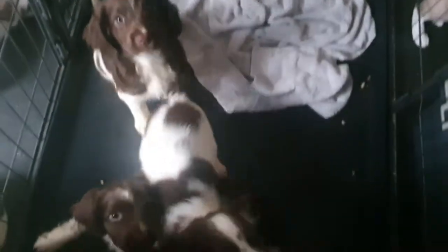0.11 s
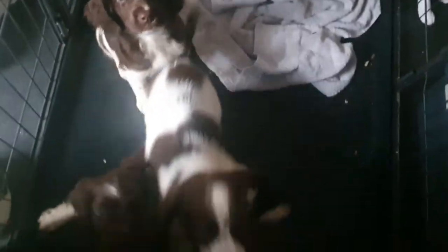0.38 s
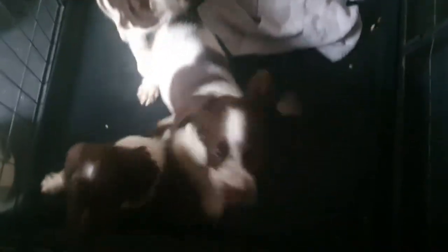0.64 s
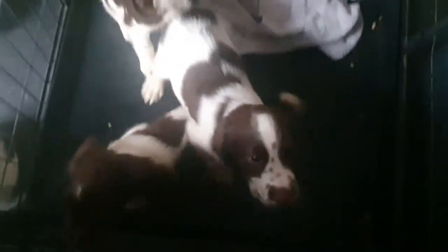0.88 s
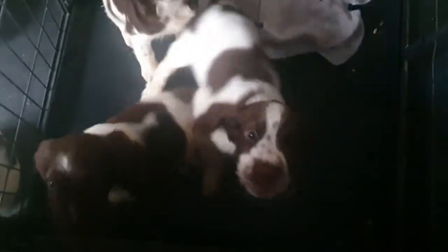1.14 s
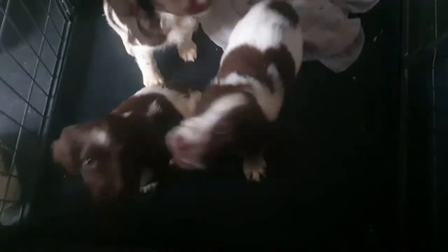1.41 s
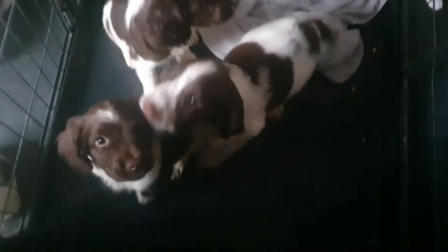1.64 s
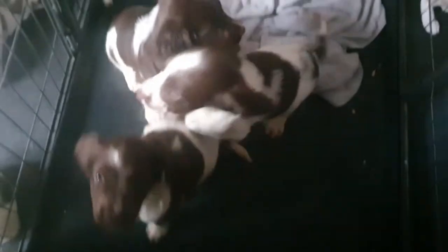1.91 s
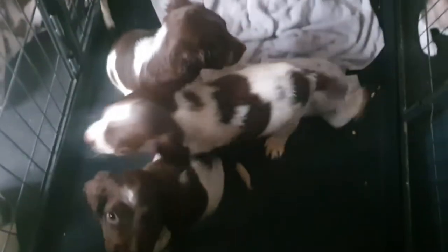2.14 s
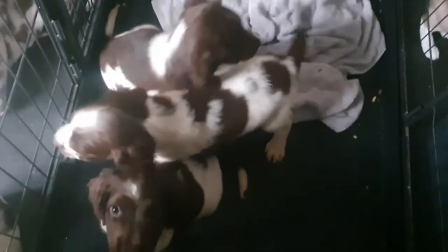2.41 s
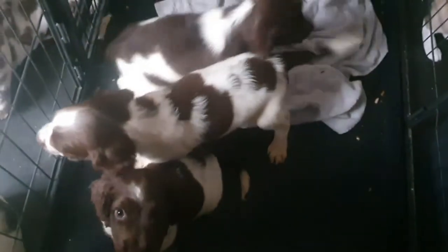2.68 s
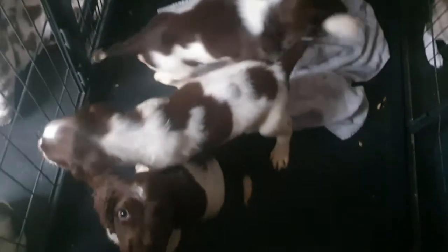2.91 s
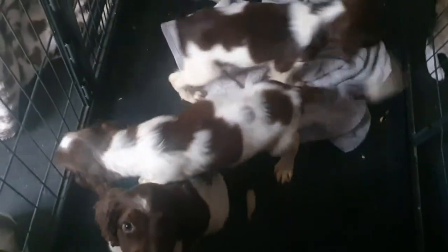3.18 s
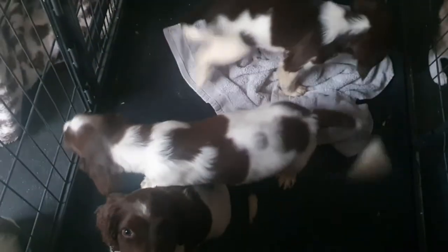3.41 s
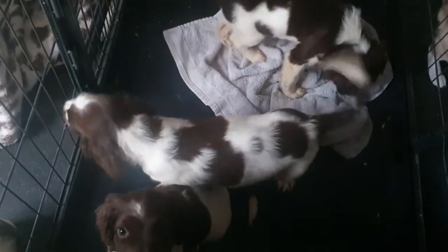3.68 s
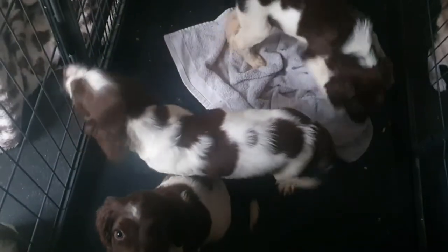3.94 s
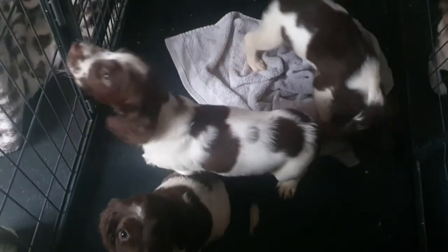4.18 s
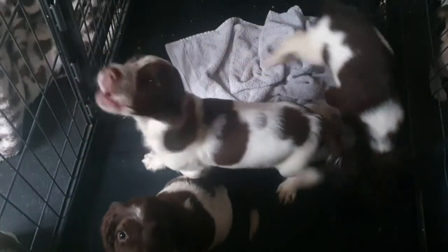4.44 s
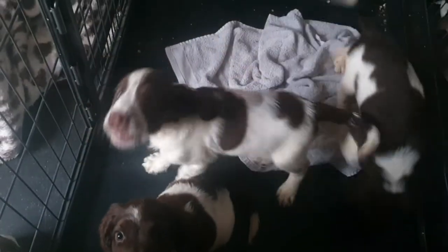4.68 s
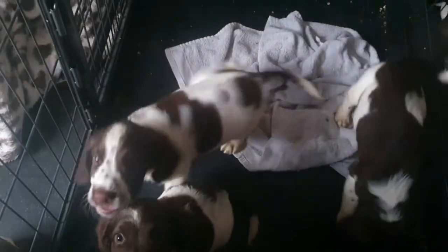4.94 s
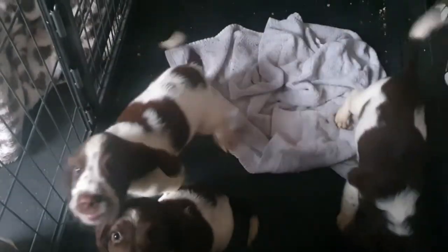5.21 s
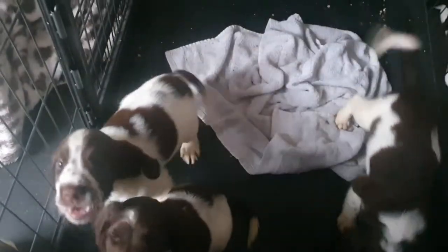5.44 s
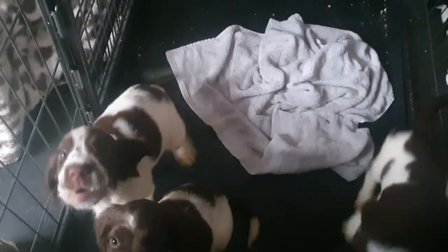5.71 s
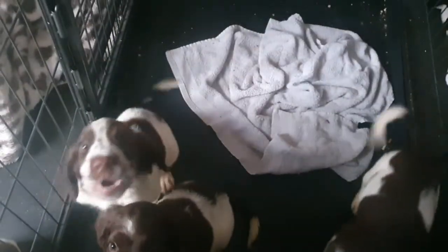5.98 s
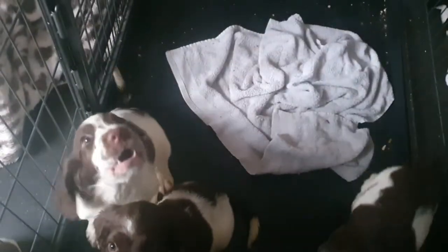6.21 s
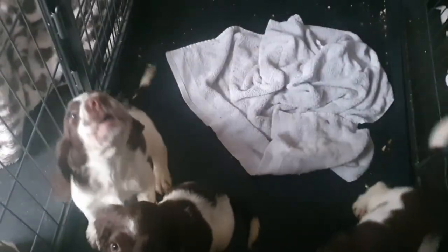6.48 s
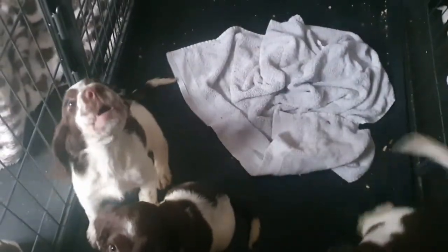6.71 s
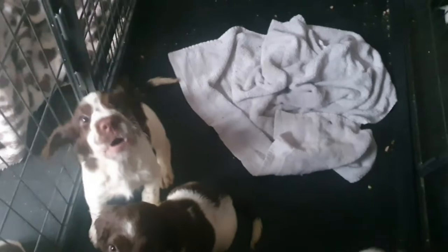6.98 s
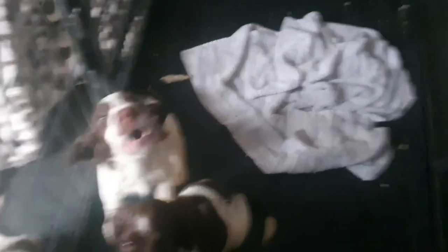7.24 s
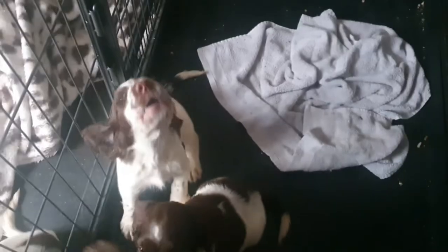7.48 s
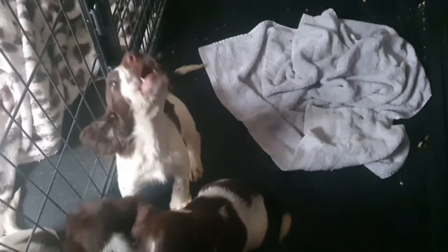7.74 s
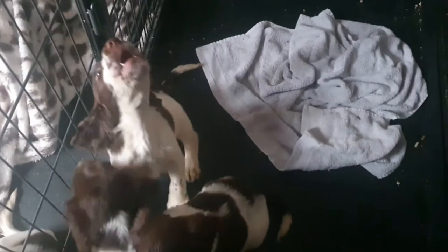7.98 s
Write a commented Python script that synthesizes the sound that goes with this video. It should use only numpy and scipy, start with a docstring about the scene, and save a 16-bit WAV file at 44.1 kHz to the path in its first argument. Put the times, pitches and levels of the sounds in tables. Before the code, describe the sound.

A string of fourteen shrill puppy cries, each ending in a quick downward drop, with tiny gaps between. The early ones are high and raspy, the last two lower, smoother and drawn out, the final one loud and nearer the centre. Littermates whimper faintly, noses sniff and whistle, paws bump the tray. Close stereo pickup, short bright indoor reverberation, quiet hush.

```python
"""Puppy crying in a wire pen

A puppy yelps and howls close to a stereo microphone in a small hard room: harmonics on a trembling pitch plus
breath noise. Other puppies whine faintly (gliding tones), noses whistle and sniff, paws thud on the floor tray
and the wire ticks (dying noise bursts). Soft steps, room hush and a tail of sparse taps lie beneath.
"""
import sys
import numpy as np
from scipy import signal
from scipy.fft import rfft, irfft
from scipy.io import wavfile
from scipy.ndimage import uniform_filter1d, minimum_filter1d

SR = 44100
rng = np.random.default_rng(int(sys.argv[2]) if len(sys.argv) > 2 else 0)


def makeup_ratio(level_db):
    """Linear amplitude ratio for a level in decibels (20 dB per factor of ten)."""
    decades = np.asarray(level_db, float) / 20
    return 10 ** decades


def wav_record(signal):
    """Record a signal, one row per channel, as 16-bit PCM in the file named by sys.argv[1]."""
    frames = np.transpose(np.atleast_2d(signal))
    bounded = np.clip(frames, -1, 1)
    # unit amplitude maps onto the largest positive 16-bit level
    quanta = np.round(bounded * 32767).astype(np.int16)
    wavfile.write(sys.argv[1], SR, quanta)


N = 358029  # samples

# One list per cry, until the breath runs out: (time [s], pitch [Hz], effort [dB], mouth opening [0-1])
CRIES = [
    [(0.0, 1530, -12.5, 0), (0.032, 1452, -25, 0.18), (0.072, 1348, -15, 0.13), (0.106, 1293, -30.5, 0.28),
     (0.134, 1180, -29, 0.19), (0.196, 1258, -26, 0.26), (0.252, 1339, -30.5, 0.44)],
    [(0.413, 1666, -17, 0.46), (0.44, 1589, -19.5, 0.8), (0.489, 1742, -15, 0.45), (0.537, 1830, -17.5, 1),
     (0.598, 1876, -24, 1)],
    [(0.78, 1512, -7, 0.01), (0.802, 1529, -23.5, 0.57), (0.832, 1804, -21.5, 0.6),
     (0.868, 1796, -15.5, 0.51), (1.018, 1804, -17, 0.4), (1.036, 1783, -28, 1)],
    [(1.217, 1120, -13, 0.07), (1.227, 1144, -18.5, 0.14), (1.271, 1659, -11.5, 0.48),
     (1.415, 1580, -21, 0.77), (1.537, 1638, -22, 0.47), (1.595, 1592, -23.5, 0.75),
     (1.66, 1642, -27, 0.62)],
    [(1.836, 1148, -20.5, 0.33), (1.87, 1294, -26.5, 0.48), (2.036, 1359, -20, 0.27),
     (2.196, 1090, -31.5, 0.79), (2.22, 1128, -25.5, 0.8), (2.418, 1140, -22, 0.75),
     (2.445, 1138, -29.5, 1)],
    [(2.636, 1140, -28.5, 0.47), (2.688, 1426, -27, 0.78), (2.734, 1529, -26, 0.85),
     (2.838, 1205, -20, 0.41), (2.94, 1169, -10.5, 0.36), (2.985, 1062, -13, 0.42)],
    [(3.203, 886, -34, 0.9), (3.267, 956, -24, 0.58), (3.335, 912.5, -30, 1), (3.379, 975, -23.5, 0.52),
     (3.429, 988, -13, 0.39), (3.516, 970.3, -24.5, 0.46)],
    [(3.714, 1155, -15, 0.29), (3.742, 1098, -20, 0.44), (3.77, 1170, -12.5, 0.28),
     (3.805, 1120, -13, 0.32), (3.9, 1173, -16, 0.4), (4.035, 1138, -16, 0.31), (4.066, 1227, -10.5, 0.26),
     (4.128, 1212, -19, 0.43)],
    [(4.3, 1310, -20, 0.8), (4.31, 1264, -20.5, 0.56), (4.348, 1532, -16.5, 0.68), (4.472, 1498, -21, 0.78),
     (4.564, 1497, -15.5, 0.86), (4.595, 1474, -16.5, 0.45)],
    [(4.775, 1034, -16, 0), (4.8, 1210, -17, 0.36), (4.82, 1477, -14, 0.45), (4.887, 1507, -13, 0.76),
     (4.945, 1537, -14.5, 0.67), (5.105, 1432, -22, 0.61)],
    [(5.294, 1027, -14, 0.23), (5.308, 1016, -23.5, 0.06), (5.336, 1309, -22.5, 0.79),
     (5.455, 1313, -15, 0.65), (5.478, 1436, -17, 0.71), (5.612, 1367, -21, 0.89), (5.632, 1310, -17, 0.62),
     (5.69, 1277, -20, 0.81), (5.8, 1296, -19.5, 0.47), (5.811, 1200, -34, 0.3)],
    [(5.986, 975, -23.5, 0.1), (6.022, 1040, -22, 0.17), (6.078, 1337, -21, 0.62), (6.286, 1272, -16, 0.73),
     (6.366, 1240, -23, 0.58), (6.43, 1093, -21.5, 0.43), (6.467, 1044, -29.5, 0.2)],
    [(6.651, 818, -30, 0), (6.671, 904, -24.5, 0.08), (6.75, 1003, -28, 0.72), (6.865, 957.5, -25.5, 0.39),
     (7.079, 1005, -24, 0.56), (7.177, 963, -21, 0.35), (7.305, 976, -20, 0.41), (7.475, 923, -18.5, 0.14)],
    [(7.661, 735, -26, 0.67), (7.701, 920, -16.5, 0.38), (7.715, 985.6, -7, 0.52),
     (7.795, 978.4, -8.5, 0.38), (8.118, 968, -13, 0)],
]
# Head direction per cry: (left-right level [dB], left lead [ms])
BEARING = [(-6.5, 0.009), (-4, 0.017), (-5.5, 0.0064), (-9.5, 0.13), (-3.5, 0.18), (-4.5, 0.21), (-5, 0.21),
           (-5, 0.15), (-5.5, 0.19), (-8, 0.2), (-6.5, 0.16), (-7.5, 0.081), (-5.5, 0.097), (-1, 0.086)]
# Voicing per cry: (roughness [0-1], breath re overtones [dB], treble [dB],
# throat stretch [share of its resonances], closing drop [s])
VOICING = [(0.47, -19, 14.5, 0.888, 0.014), (0.5, -29, 1, 0.984, .04), (0.28, -27, 6.5, 0.986, .043),
           (0.45, -31.5, -7.5, 0.888, .058), (0.3, -33, -5, 0.84, 0.05), (.55, -20.5, -6, 0.939, 0.068),
           (0.55, -20, -2, 0.98, 0.018), (0.6, -23, -1.5, 1.012, 0.042), (0.35, -22.5, -1, 0.95, 0.06),
           (0.2, -25.5, -12.5, 1, .06), (0.5, -34.5, -13, 1.024, 0.025), (0.28, -34.5, -12, 1.05, 0.033),
           (0.14, -38.5, -13, 0.98, .045), (0.1, -32, -16.5, 1.07, 0.095)]
# Harmonics 2, 3, 4 of the folds per cry, re throat colour: (second [dB], third [dB], fourth [dB])
FOLDS = [(-5, 7, 3.5), (4.5, 3.5, 1), (5.5, 7, 0), (3, 8, 8), (-7.5, 6, 1.5), (-2.5, -0.5, 5),
         (-4.5, 4.5, -2), (0, 3, 2.5), (7.5, 1.5, 4), (4.5, 0.4, 0.5), (1.5, -1, 4.5), (11, -1.5, 2),
         (0.5, -8, 0.5), (-0.5, -2.5, 0)]
# Open-mouth overtone colour re fundamental: (frequency [Hz], level [dB])
THROAT = [(1600, 9.5), (2900, 0.5), (3500, 9), (4300, -2.5), (5300, -16), (5900, -17), (6500, -12),
          (7500, -14.5), (9800, -16), (12000, -31), (15500, -35.5)]
# Breath noise colour: (frequency [Hz], level [dB])
BREATH = [(300, -30), (800, -6.5), (1300, -3), (2000, -17.5), (2900, -5), (4300, -8.5), (5500, -15),
          (7000, -5), (8200, -13.5), (9700, -4), (11200, -17.5), (12800, -11.5), (15500, -37.5)]
# Brief catches that bend the pitch and let it back: (time [s], half width at 1/e [s], pitch change [share])
CATCHES = [(1.905, 0.012, .06), (5.386, 0.0069, 0.066), (5.527, 0.0092, -0.039)]
# Treble shading between the ports: (frequency [Hz], factor on the left-right dB)
SHADOW = [(300, 2.5), (1300, -0.01), (2400, 2.5), (5000, 3), (15000, 2.32)]
# Band decay of the room: (frequency [Hz], t60 [s])
ROOM_T60 = [(500, 0.27), (2000, 0.34), (4000, 0.33), (9000, 0.41)]
# Hush colour: (frequency [Hz], level [dB])
HUSH_COLOUR = [(30, -25), (90, -16.5), (300, -21), (1000, -10.5), (3500, -21), (9700, -25), (15500, -35.5)]
# Colour of the tray's low end: (frequency [Hz], level [dB])
TRAY_LOW = [(30, -32.5), (75, 5), (200, -11.5), (600, -32), (2000, -69.5)]
# Colour of a paw's impact on the tray: (frequency [Hz], level [dB])
TRAY = [(30, -46), (75, -20), (170, -1.5), (400, -2), (900, -7), (2000, -13.5), (8000, -35)]
# Paws on the tray: (time [s], impact level [dB], low-end boom level [dB])
THUDS = [(0.041, -25, -54), (0.113, -34, -48), (0.609, -37.5, -46), (3.895, -42.5, -44.5),
         (4.447, -75, -48), (5.068, -45.5, -53), (5.891, -35, -54), (6.958, -42, -50), (7.147, -47.5, -55),
         (7.335, -51, -50), (7.733, -35.5, -37)]
# Wire colour: (frequency [Hz], level [dB])
WIRE = [(1000, 25.5), (5000, 18.5), (15000, 12.5)]
# Wire ticks: (time [s], level [dB])
TICKS = [(0.114, -27), (0.319, -33.5)]
# Airy nose whistles during some cries: (start [s], length [s], start pitch [Hz], end pitch [Hz], level [dB])
NOSE = [(1.036, 0.034, 9070, 10300, -36), (2.633, 0.22, 10000, 9840, -38.5),
        (4.03, .12, 10140, 9610, -33.5), (4.577, 0.063, 9760, 9200, -35)]
# Whines of other puppies: (start [s], length [s], start pitch [Hz], end pitch [Hz], mid level [dB])
WHINES = [(1.752, 0.14, 1003, 955, -44), (2.497, .09, 995, 718, -50.5), (3.196, 0.1, 1167, 1010, -33.5),
          (3.497, 0.29, 900, 510, -52), (3.641, 0.073, 1262, 902, -33), (5.401, 0.23, 1186, 778, -37),
          (5.91, 0.15, 830, 903, -42), (6.054, 0.67, 856, 458, -43.5), (7.827, 0.18, 703, 610, -42)]
# Thin nose whistles: (start [s], length [s], start pitch [Hz], end pitch [Hz], mid level [dB])
WHISTLES = [(3.1, .1, 7300, 8400, -46), (3.57, .08, 7900, 8600, -44), (4.22, .08, 8400, 9500, -44),
            (4.33, .22, 4050, 3550, -42), (5.27, .28, 7450, 5850, -45)]
# Microphone housing, a dip then a lift: (frequency [Hz], gain [dB])
HOUSING = [(1650, 0), (2050, -4), (2500, 2.5)]

# Roughness: each setting applies in full at roughness 1
TREMBLE_SHARE = 0.01945  # rms, of pitch
RASP_DB, RASP_HZ = 2.5, 57.5  # quick uneven loudness
BLUR_TURNS, FUZZ_SHARE, FUZZ_HZ = 0.0078, 0.045, 143  # phase wander per order above 1; uneven loudness
# Extra as the folds go slack; dulling is per order above 1
DROP_BLUR_TURNS, DROP_FUZZ_SHARE, DROP_DULL_DB = 0.08, 0.69, -2
# Last push: shares of the drop's time and depth; levels re median effort
SLACK_HZ, PUSH_TIME_SHARE, PUSH_DEPTH_SHARE, PUSH_DB, FADE_DB = 700, 0.62, 0.45, -1.5, -19
SHUT_DB = -33  # overtone loss with the mouth shut
LEAK_DB = -9  # breath drive re effort that remains without overtones
ROOM_DB, HUSH_DB = -3.5, -57
SHUFFLE_DB, STEPS_PER_S = -71, 8
OVERTONE_DB, SNIFF_DB = -11, -3.5  # whine overtones re fundamental; sniff re its whistle
WHINE_SWELL_DB, WHISTLE_SWELL_DB = 6, 23  # growth, start to end
CEILING = 0.88  # limiter, full scale = 1


def evened(x):
    """Scales to rms 1."""
    return x / np.sqrt(np.mean(x ** 2) + 1e-20)


def read(points, hz):
    """Interpolates a table over log frequency."""
    f, value = np.transpose(points)
    return np.interp(np.log(hz + 1), np.log(f + 1), value)


def add(mix, start_s, sound):
    """Mixes a sound in at its start time, cut at the end."""
    part = mix[:, round(start_s * SR):][:, :sound.shape[1]]
    part += sound[:, :part.shape[1]]


def noise(colour, count):
    """Noise of rms 1 with the given colour."""
    hz = np.fft.rfftfreq(count, 1 / SR)
    spectrum = rfft(rng.standard_normal(count)) * makeup_ratio(read(colour, hz))
    return evened(irfft(spectrum, count))


def drift(count, hz):
    """Slow random movement of rms 1, mostly below hz."""
    return noise([(4, 0), (hz, -5), (12 * hz, -110)], count)


def patchy(x, depth_db):
    """Makes noise come and go in patches of frequency and time."""
    z = signal.stft(x, nperseg=256)[2]
    field = uniform_filter1d(rng.standard_normal(z.shape), size=5, axis=0)
    field = uniform_filter1d(field, size=14, axis=1)
    return signal.istft(z * makeup_ratio(depth_db * evened(field)), nperseg=256)[1][:len(x)]


def placed(x, pan_db, lead_ms):
    """Two ports hear the sound at different times, with level difference varying by frequency."""
    x = np.pad(x, 64)
    hz = np.fft.rfftfreq(len(x), 1 / SR)
    side = np.array([[0.5], [-0.5]])
    gain = makeup_ratio(side * pan_db * read(SHADOW, hz))
    advance = np.exp(2j * np.pi * hz * side * lead_ms / 1000)
    return irfft(rfft(x) * gain * advance, len(x))[:, 64:]


def with_drop(rows, drop_s):
    """Appends a last push and the closing pitch drop, as the folds go slack."""
    end_s, hz, _, _ = rows[-1]
    usual_db = np.median(np.transpose(rows)[2])
    push_hz = hz + PUSH_DEPTH_SHARE * (SLACK_HZ - hz)
    return [*rows, (end_s + PUSH_TIME_SHARE * drop_s, push_hz, usual_db + PUSH_DB, 0),
            (end_s + drop_s, SLACK_HZ, usual_db + FADE_DB, 0)]


def cry(rows, pan_db, lead_ms, rough, breath_db, treble_db, stretch, drop_s, second_db, third_db, fourth_db):
    """Harmonics on a trembling pitch; the mouth lets out the overtones and the breath noise."""
    s, *columns = np.transpose(with_drop(rows, drop_s))
    t = np.arange(s[0], s[-1], 1 / SR)
    hz, effort_db, mouth = (np.interp(t, s, c) for c in columns)
    tremble = TREMBLE_SHARE * rough * drift(len(t), 34.6)
    catches = sum(share * np.exp(-((t - at) / wide) ** 2) for at, wide, share in CATCHES)
    hz = hz * (1 + tremble + catches)
    turns = np.cumsum(hz) / SR
    k = np.arange(1, 18)[:, None]  # harmonic order

    throat_hz = k * hz / stretch
    throat_db = read(THROAT, throat_hz) + SHUT_DB * (1 - mouth)
    folds_db = (k == 2) * second_db + (k == 3) * third_db + (k == 4) * fourth_db
    shelf_db = np.interp(throat_hz, [5600, 6300, 9500, 12500], [0, 1, 1, 0]) * treble_db
    weight = makeup_ratio(np.where(k > 1, throat_db, 0) + folds_db + shelf_db) * (k * hz < 16000)
    weight = weight * makeup_ratio(effort_db) / np.sqrt((weight ** 2).sum(0))

    # each harmonic swells and fades on its own, the high ones most
    shimmer_db = np.minimum(0.8 * k, 7) * (0.5 + rough) * np.array([drift(len(t), 15) for _ in k])
    shimmer_db = shimmer_db + RASP_DB * rough * drift(len(t), RASP_HZ)
    slack = np.clip((t - rows[-1][0]) / drop_s, 0, 1)
    dull_db = DROP_DULL_DB * (k - 1) * np.sqrt(slack)
    # uneven cycles smear the high harmonics into bands of noise
    blur = BLUR_TURNS * rough + DROP_BLUR_TURNS * slack
    wander = (k - 1) * blur * np.array([drift(len(t), FUZZ_HZ) for _ in k])
    phase = 2 * np.pi * (k * turns + wander + rng.random(k.shape))
    tone = (weight * makeup_ratio(shimmer_db + dull_db) * np.sin(phase)).sum(0)
    tone = tone * (1 + (FUZZ_SHARE * rough + DROP_FUZZ_SHARE * slack) * drift(len(t), FUZZ_HZ))

    overtone_power = (weight[1:] ** 2).sum(0)
    breath = np.sqrt(overtone_power + makeup_ratio(2 * (effort_db + LEAK_DB))) * makeup_ratio(breath_db)
    colour = [(f, db + (f > 5000) * treble_db / 2) for f, db in BREATH]
    puffs = patchy(noise(colour, len(t)), 4)
    edges = np.minimum(np.minimum(t - t[0], t[-1] - t) / 0.0097, 1)
    return s[0], placed(edges * (np.sqrt(2) * tone + breath * puffs), pan_db, lead_ms)


def room(x):
    """Sparse taps of random sign, each band dying at its own speed, other taps in each port."""
    taps = np.zeros((2, SR))
    at = np.arange(120, SR - 20, 20) + rng.integers(0, 20, (2, (SR - 121) // 20))
    np.put_along_axis(taps, at, rng.choice([-1., 1.], at.shape), 1)
    hz, t, z = signal.stft(taps, SR, nperseg=256)
    decay = makeup_ratio(-60 * t / read(ROOM_T60, hz)[:, None])
    tail = signal.istft(z * decay, SR, nperseg=256)[1]
    tail = tail / np.linalg.norm(tail[0])
    return makeup_ratio(ROOM_DB) * signal.fftconvolve(x.mean(0)[None], tail, axes=1)[:, :N]


def hush():
    """Quiet room noise, unlike in the two ports, coming and going slowly."""
    ports = np.array([patchy(noise(HUSH_COLOUR, N), 3) for _ in range(2)])
    return makeup_ratio(HUSH_DB + 2.5 * drift(N, 4)) * ports


def shuffle():
    """Soft random steps ring the low end of the tray."""
    steps = makeup_ratio(4 * rng.exponential(1, N)) * (rng.random(N) < STEPS_PER_S / SR)
    t = np.arange(SR // 4) / SR
    swell = signal.oaconvolve(steps, t * makeup_ratio(-60 * t / 0.2))[:N]
    return makeup_ratio(SHUFFLE_DB) * evened(swell) * placed(noise(TRAY_LOW, N), 1.5, 0.1)[:, :N]


def knock(colour, level_db, t60_s, pan_db, rise_s):
    """An impact: coloured noise that dies away, partly unlike in the two ports."""
    t = np.arange(SR // 3) / SR
    common, left, right = (noise(colour, len(t)) for _ in range(3))
    pair = 0.98 * common + 0.71 * np.array([left, right])
    pan = np.array([[0.5], [-0.5]]) * pan_db
    return pair * makeup_ratio(level_db - 60 * t / t60_s + pan) * np.minimum(t / rise_s, 1)


def thud(impact_db, boom_db):
    """A paw's impact on the tray over the slower boom of its low end."""
    return knock(TRAY_LOW, boom_db, 0.24, -2.5, 0.012) + knock(TRAY, impact_db, 0.056, -7, 0.0062)


def tick(level_db):
    """The wire ticks: a bright burst with a very fast rise."""
    return knock(WIRE, level_db, 0.04, -8, 0.00013)


def whine(start_s, length_s, start_hz, end_hz, level_db, swell_db):
    """A whine or nose whistle: a gliding tone, faint overtones below a limit, growing by swell_db."""
    u = np.arange(0, 1, 1 / (length_s * SR))
    hz = (start_hz + u * (end_hz - start_hz)) * (1 + 0.0065 * drift(len(u), 35))
    angle = 2 * np.pi * np.cumsum(hz) / SR
    overtones = sum(np.sin(k * angle) / k * (k * start_hz < 8000) for k in range(2, 7))
    tone = np.sin(angle) + makeup_ratio(OVERTONE_DB) * overtones
    level = makeup_ratio(level_db + swell_db * (u - 0.5)) * signal.windows.tukey(len(u), 0.15)
    return start_s, placed(level * tone, -1.5, 0.075)


def sniff(start_s, length_s, level_db):
    """The hiss of air drawn in through the nose: patchy breath noise."""
    count = round(length_s * SR)
    hiss = patchy(noise(BREATH, count), 3) * np.hanning(count) ** 0.5
    return start_s, placed(makeup_ratio(level_db + SNIFF_DB) * hiss, -4, 0.2)


def scene():
    """All sources, plus the room's answer to all but hush and shuffle."""
    mix = np.zeros((2, N))
    for rows, bearing, voicing, folds in zip(CRIES, BEARING, VOICING, FOLDS):
        add(mix, *cry(rows, *bearing, *voicing, *folds))
    for start_s, impact_db, boom_db in THUDS:
        add(mix, start_s, thud(impact_db, boom_db))
    for start_s, level_db in TICKS:
        add(mix, start_s, tick(level_db))
    for row in NOSE:
        add(mix, *whine(*row, 0))
    for row in WHINES:
        add(mix, *whine(*row, WHINE_SWELL_DB))
    for row in WHISTLES:
        add(mix, *whine(*row, WHISTLE_SWELL_DB))
        add(mix, *sniff(*row[:2], row[4]))
    return mix + room(mix) + hush() + shuffle()


def top_cut(x):
    """Nothing passes above the cut-off."""
    return signal.sosfilt(signal.butter(12, 15700, fs=SR, output="sos"), x)


def record(dry):
    """Microphone housing response, then a peak limiter with a smoothed gain."""
    hz = np.fft.rfftfreq(N, 1 / SR)
    heard = irfft(rfft(dry) * makeup_ratio(read(HOUSING, hz)), N)
    gain = np.minimum(CEILING / (abs(heard).max(0) + 1e-9), 1)
    gain = uniform_filter1d(minimum_filter1d(gain, size=441), size=221)
    return top_cut(heard * gain)


dry = scene()
out = record(dry)
wav_record(out)
```